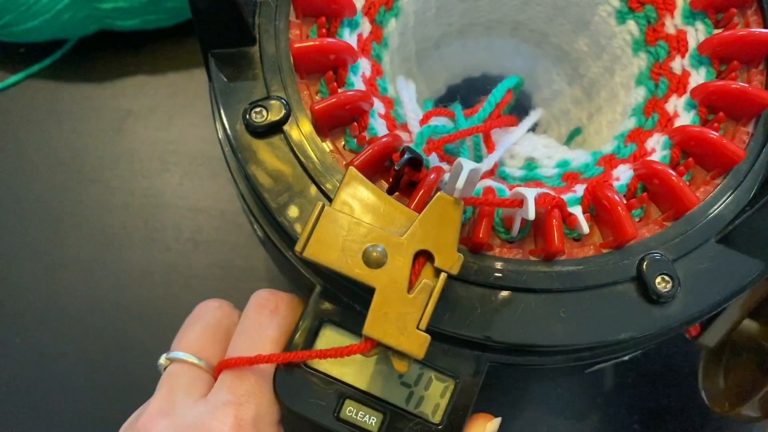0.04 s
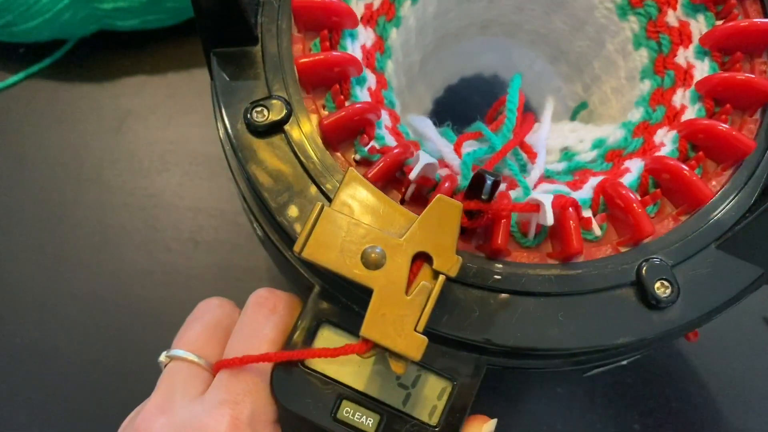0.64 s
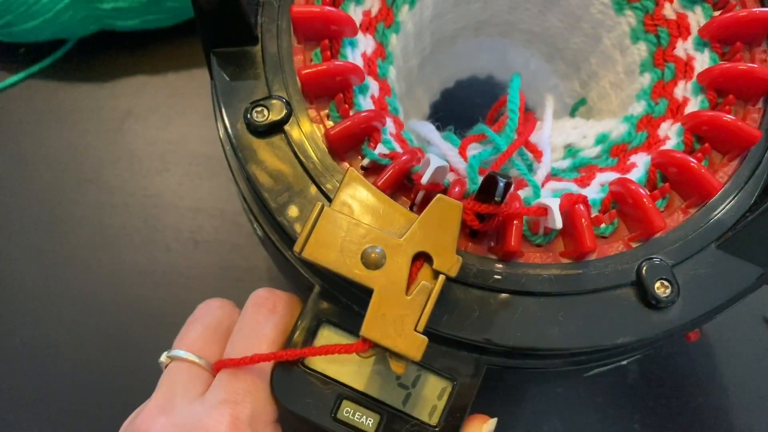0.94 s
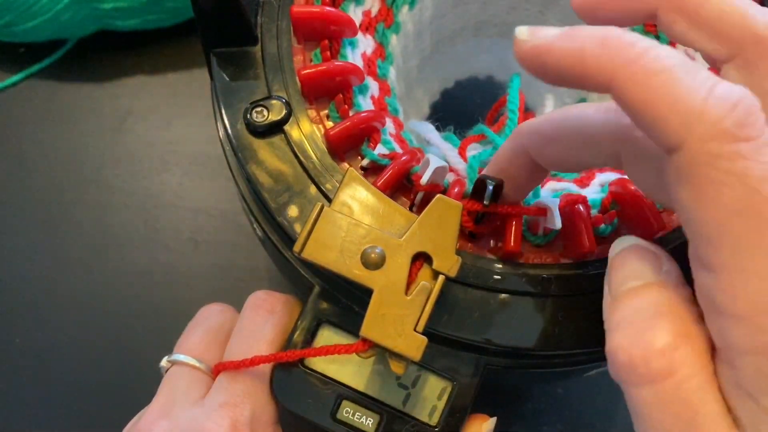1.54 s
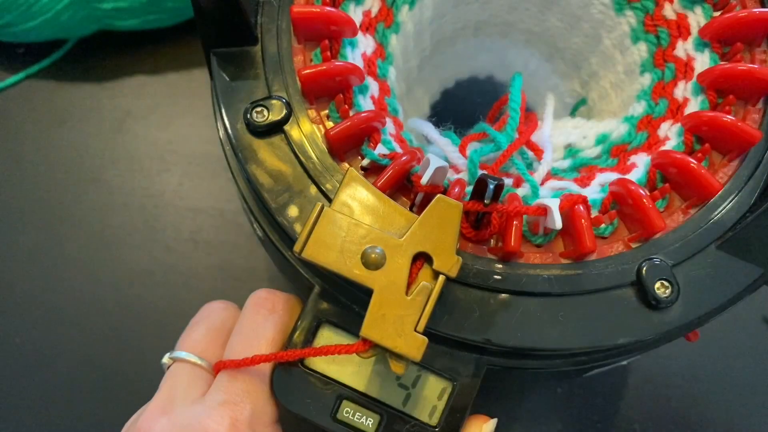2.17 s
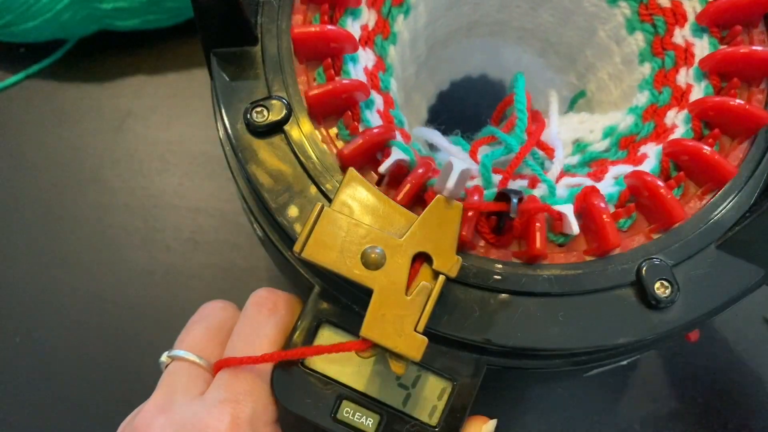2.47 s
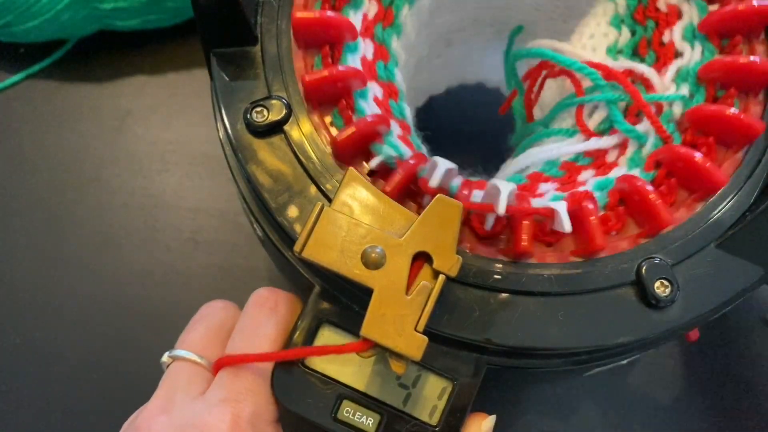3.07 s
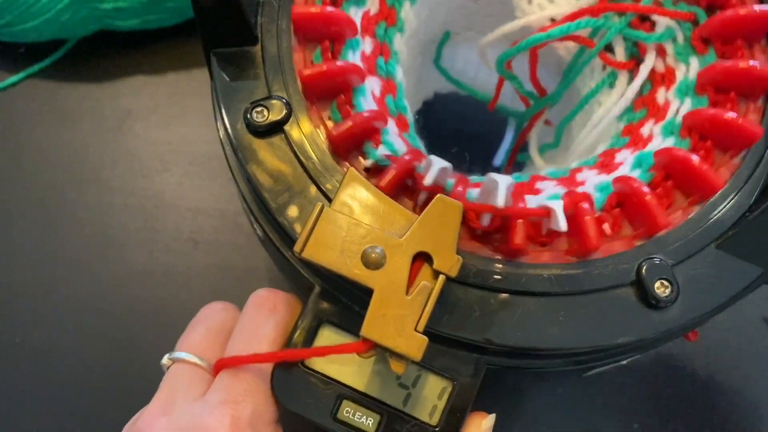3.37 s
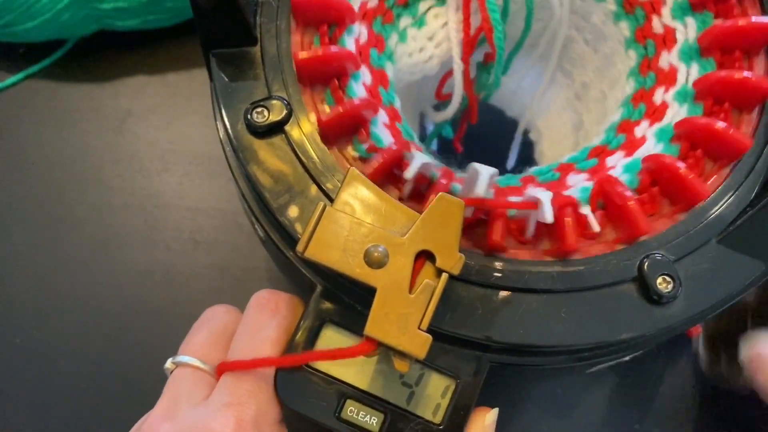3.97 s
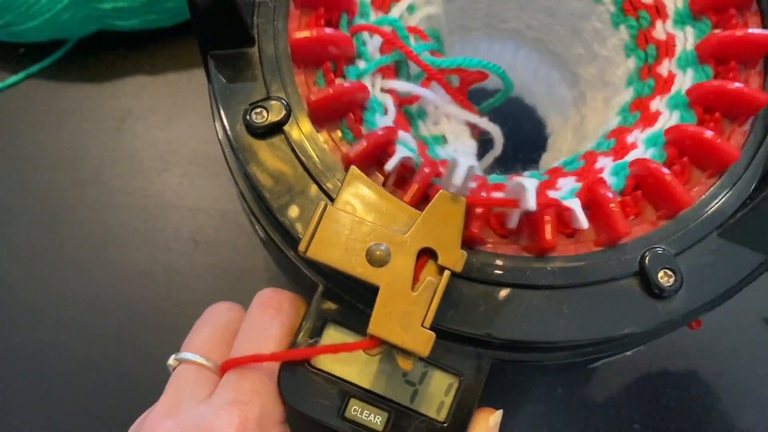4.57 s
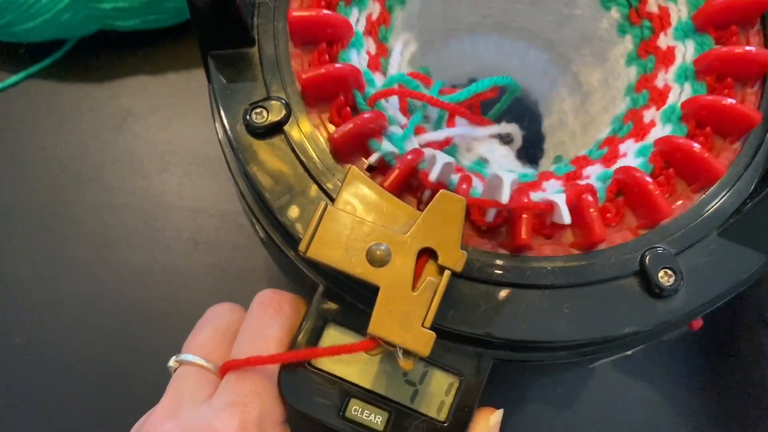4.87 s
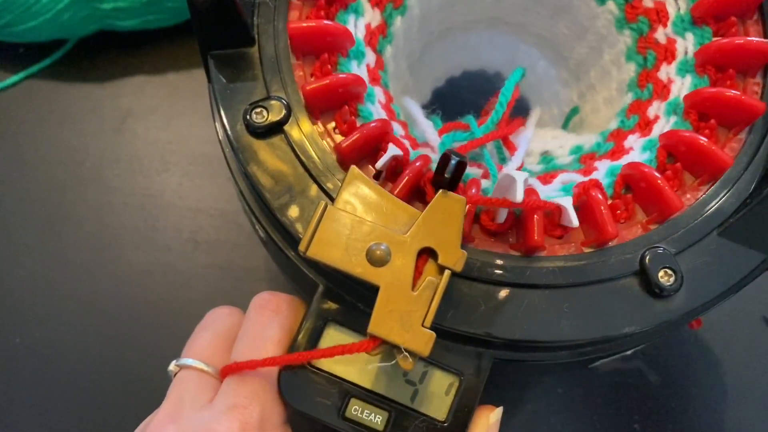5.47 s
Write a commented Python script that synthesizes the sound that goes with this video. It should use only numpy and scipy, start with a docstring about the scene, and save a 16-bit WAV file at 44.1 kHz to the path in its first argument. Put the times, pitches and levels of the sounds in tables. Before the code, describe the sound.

Close up in a small room, a plastic knitting machine winds down with quiet scraping and ticking. A short lull holds only a few light clicks and faint finger brushes. Then the crank turns again for about three seconds: needles clack, snap and rattle quickly against the hollow casing over rubbing plastic, hissing yarn and a low rumble of gears, before the clatter thins out and softens.

```python
"""A low gear rumble, faint squeaks, then rubbing and clacking: a hand-cranked plastic circular knitting
machine on a table in a small room. It slows to rest, a finger flicks a needle and nudges the ring,
then it runs a full round and slows again. Needles rub along the cam track, click, rattle and clack
as they drop; yarn hisses through the guide. The gears shake the table and the hollow drum."""
import sys
import numpy as np
from scipy import signal
from scipy.fft import rfft, irfft, next_fast_len
from scipy.io import wavfile
from scipy.ndimage import uniform_filter1d

SR = 44100
rng = np.random.default_rng(int(sys.argv[2]) if len(sys.argv) > 2 else 0)


def generate_wav(signal):
    """Clip the signal to [-1, 1] and save it as 16-bit WAV at the path in sys.argv[1]."""
    frames = np.transpose(np.atleast_2d(signal))
    scaled = np.clip(frames, -1, 1) * 32767
    pcm = np.round(scaled).astype(np.int16)
    wavfile.write(sys.argv[1], SR, pcm)


N = 242991
TIME_S = np.arange(N) / SR
FFT_SIZE = 2 * next_fast_len(N // 2 + 4096)
MID_ONLY = np.array([[1], [0]])   # two-row signals are mid and side

# Strain on the drive. Each row: time in seconds, table rumble in dB, drum hum in dB.
DRIVE_STRAIN = [(0.0, -69, -64), (0.05, -51, -64), (0.26, -52, -54.5), (0.43, -69, -63), (0.69, -62, -62.5),
                (0.88, -68, -67.5), (0.93, -66, -58), (1.06, -60, -68), (1.11, -78, -87),
                (1.66, -83, -88.5), (1.68, -56, -71), (1.78, -74, -88), (1.98, -83.5, -92),
                (2.03, -64, -88), (2.18, -58, -56.5), (2.32, -66, -66), (2.47, -46.5, -46),
                (2.62, -53.5, -55.5), (3.3, -46, -45.5), (3.9, -46.5, -47.5), (4.05, -54, -46),
                (4.14, -42, -50), (4.3, -47, -45.5), (4.62, -52, -52), (4.75, -43, -50), (5.12, -54, -50),
                (5.3, -63, -59.5), (5.51, -62.5, -56)]
# Resonances. Each row: frequency in Hz, bandwidth in Hz, gain in dB.
TABLE_RESONANCES = [(65.1, 6, 3), (90.7, 30, -2), (114.5, 5, -10), (131.4, 8.3, -4.5)]
DRUM_RESONANCES = [(179, 39, -9), (192, 6.7, 3), (274.7, 37, -12.5), (339, 16, -16.5)]
CASING_RESONANCES = [(452.3, 20, 7), (516.5, 20, 0.5), (690, 145, -2), (780, 42, 0.5), (1070, 18, -19.5),
                     (1520, 34, -30), (1740, 96, -4.5), (2300, 113, -6), (4240, 250, -8), (4740, 550, -4.5)]
# Tight plastic slips. Each row: start in seconds, length in seconds, pitch in Hz, level in dB.
SQUEAK_EVENTS = [(0.005, 0.01, 1910, -58), (0.029, 0.014, 1720, -51), (0.361, 0.0083, 3050, -50),
                 (3.786, 0.012, 3160, -33)]
# Two spells of cranking, a list each. Each row: time in seconds, rub gain in dB, hiss gain in dB.
CRANK_SPELLS = [
    [(0.042, -47, -79), (0.142, -50, -57), (0.25, -47, -54.5), (0.36, -47.5, -63), (0.48, -48.5, -57),
     (0.626, -54, -63), (0.7, -77, -70.5)],
    [(2.28, -61.5, -77), (2.34, -46, -59.5), (2.41, -46, -57), (2.49, -39.5, -44.5), (2.6, -47.5, -51),
     (2.66, -41.5, -52), (2.74, -43.5, -51), (2.87, -47.5, -45), (3.01, -40.5, -43), (3.12, -38, -44.5),
     (3.35, -42.5, -44.5), (3.43, -38, -44.5), (3.52, -34.5, -43), (3.75, -42, -41.5), (3.95, -39, -41.5),
     (4.22, -41, -43), (4.3, -39.5, -44), (4.42, -40, -43.5), (4.6, -49.5, -50.5), (4.69, -43.5, -45.5),
     (4.78, -42.5, -50), (4.98, -47, -48.5), (5.15, -41.5, -52), (5.32, -50.5, -55), (5.51, -54.5, -68.5)],
]
# Needles and ring hit the shell. Each row: start in seconds, gain in dB, body and treble in dB
# relative to that gain, pitch of the struck spot in Hz.
SHELL_KNOCKS = [(0.0308, -48.5, 3, -29, 696), (0.045, -37.5, -3.5, -18.5, 714),
                (0.0765, -40.5, -14, -24, 1240), (0.0815, -38, -10, -19.5, 720), (0.1128, -53, 4, -24, 750),
                (0.148, -53, 1, -19, 900), (0.172, -50, -1, -22, 1110), (0.227, -58, -15, -17, 950),
                (0.263, -47.5, -2, -27, 1200), (0.351, -54, -15, -20, 1050), (0.4045, -72, -3, -22, 1020),
                (0.452, -49, -17, -14, 720), (0.476, -62, 9, -20, 1020), (0.508, -55, -3, -22, 890),
                (0.5767, -63.5, 14, -2, 980), (0.6454, -59.5, 9, -2, 740), (0.7572, -55, -2, -29, 497),
                (0.918, -62.5, 8, -34, 870), (0.9413, -38, -13, -27, 820), (0.9606, -49.5, 1, -29, 726),
                (1.0224, -64, 2, -36, 790), (1.039, -74, 5, -34, 740), (1.0519, -70.5, 11, -37, 596),
                (1.2377, -37.5, -15, -9.5, 592), (1.2385, -51.5, 0.5, -22, 917),
                (1.6679, -48.5, -2, -12, 680), (1.669, -53.5, 2.5, -21, 980),
                (1.7221, -55.5, 0.5, -22, 934), (2.0138, -66, 12, 3, 670), (2.0369, -45, -0.5, -38, 830),
                (2.1267, -54.5, -1, -41, 716), (2.1819, -72, 18.5, -37, 730),
                (2.2801, -46.5, -7.5, -48, 836), (2.4683, -32, -33, -26, 740), (2.517, -32.5, -8, -21, 680),
                (2.6557, -33, -18, -35, 684), (2.6844, -31, -11, -17, 794),
                (2.7876, -28.5, -13.5, -17, 724), (2.809, -28, -4.5, -21, 760), (2.8287, -28, -1, -19, 685),
                (2.9372, -29.5, -5, -23, 635), (2.953, -26.5, -4.5, -29, 548),
                (2.9635, -34, -6.5, -20, 610), (3.0116, -43, 7, -19, 717), (3.0334, -32, -3.5, -19, 1035),
                (3.0564, -29, -4.5, -17, 710), (3.078, -33, -3, -27, 820), (3.0896, -25, -31, -16, 784),
                (3.1289, -43, -14, -21, 620), (3.151, -34.5, -8, -11, 780), (3.1743, -22, -10, -22.5, 431),
                (3.1885, -27, -6.5, -17, 815), (3.2331, -28, -16, -28, 800), (3.244, -19.5, -6, -16, 1150),
                (3.2465, -19.5, -8, -31, 1610), (3.2694, -27.5, -2.5, -15, 585),
                (3.3346, -32, -5, -23, 1190), (3.3755, -31.5, -6, -14.5, 680),
                (3.3834, -35.5, 3.5, -35, 784), (3.3969, -25, -8, -22, 820), (3.4053, -32, -10, -14, 536),
                (3.4575, -33.5, -2, -19, 570), (3.4707, -31, -9, -28, 800), (3.489, -23, -2.5, -29, 486),
                (3.5014, -25.5, -11, -12.5, 797), (3.5165, -25, -6, -36, 512),
                (3.5768, -21.5, -11.5, -32, 710), (3.5826, -34.5, -3, -8.5, 507),
                (3.6027, -37, -4, -14, 890), (3.6269, -25, -0.5, -24, 1433), (3.631, -39, -1, -17, 730),
                (3.687, -24, -5.5, -20, 760), (3.7735, -20.5, -8.5, -33, 1320), (3.7869, -31, -3, -28, 768),
                (3.8064, -26.5, -5, -21, 528), (3.8208, -28, -14, -14.5, 705),
                (3.8554, -31.5, -1.5, -14, 640), (3.8869, -23.5, -9, -25, 737),
                (3.9001, -22, -14.5, -22, 486), (3.9144, -28.5, -15, -16, 780),
                (3.9983, -22, -5.5, -19.5, 1540), (4.0141, -24, -10, -18.5, 700),
                (4.024, -23, -17.5, -21, 602), (4.0604, -44.5, 5.5, -13, 540),
                (4.0782, -29.5, -5, -21, 810), (4.1128, -23, -13, -17, 524), (4.2339, -19, -7.5, -20, 697),
                (4.2503, -31, -5, -14, 736), (4.344, -35.5, -0.5, -12, 1060), (4.367, -19, -9.5, -17, 614),
                (4.464, -28, -6.5, -28, 546), (4.5186, -19.5, -7.5, -21, 704),
                (4.5264, -30, -0.5, -21, 513), (4.653, -43, 3.5, -26, 1140), (4.6768, -31.5, -12, -21, 810),
                (4.7077, -23, -3, -15.5, 628), (4.7174, -28.5, -6, -15, 780), (4.7254, -38, -11, -10, 467),
                (4.8838, -32.5, 1, -37, 794), (4.8893, -36, 4, -33, 499), (5.017, -33.5, -9.5, -31, 510),
                (5.0564, -32, -4.5, -11, 850), (5.1332, -35, -3, -39, 873)]
# Body, main, click and treble bands. Each row: low and high edge in Hz, T60 in seconds, gain in dB.
CONTACT_BANDS = [(461, 1313, 0.056, -2.5), (1530, 3120, 0.048, -10), (2730, 5220, 0.035, 4),
                 (5980, 16600, 0.027, 3.5)]
# Sharp plastic clicks: mostly bright needle snaps, plus the click of two dull knocks.
# Each row: start in seconds, gain in dB, body, click and treble in dB relative to that gain.
PLASTIC_CLICKS = [(0.2777, -31, -18, -9.5, -3.5), (1.2285, -33.5, -13.5, -4, -16),
                  (2.0365, -41.5, -16, -14, -40), (2.28, -60, -12, -19, -43), (2.428, -45, -14, -3, -18),
                  (2.7693, -29.5, -9, -4.5, 1.5), (2.827, -36, -17, -10, -8),
                  (2.8404, -23.5, -18, -14, -18.5), (2.9645, -29.5, -12, -20, -11),
                  (3.068, -33, -17, -6, -17), (3.082, -37, -11, -15, -10), (3.1506, -28.5, -2.5, -13, -6),
                  (3.167, -29, -10, -12, -20), (3.2831, -20.5, -7, -24, -15.5),
                  (3.406, -28.5, -12, -15, -12), (3.6012, -27, -20, -19, -11.5),
                  (3.7026, -23.5, -7.5, -15.5, -15.5), (3.822, -34, -11, -17, -16),
                  (3.919, -28, -8, -7, -16), (4.0252, -28, -22, -6.5, -23), (4.1148, -28.5, -3.5, -15, -8),
                  (4.1368, -28, -6, -13, -17), (4.145, -27, -8, -9, -20), (4.264, -24, -17, -12.5, -16),
                  (4.345, -30, -22, -16, -6.5), (4.379, -26, -7, -15, -26), (4.3996, -26.5, -16, -15, -15),
                  (4.408, -35, -14, -19, -8), (4.5412, -25, -14, -18, -20), (4.5494, -28, -10, -12, -11.5),
                  (4.562, -39, -14, -3, -25), (4.7398, -29.5, -23, -11, -15.5), (4.924, -44, -24, -21, -28),
                  (4.9384, -28.5, -16, -13, -16), (5.097, -35.5, -8, -15, -29),
                  (5.1398, -30.5, -13, -16, -14.5), (5.346, -30, -13, -9, -5.5)]
# Modes of a needle. Each row: frequency in Hz, T60 in seconds, gain in dB.
NEEDLE_MODES = [(2480, 0.018, -5.5), (3610, 0.018, -0.5), (4760, 0.017, -2.5), (8100, 0.019, 1.5),
                (10780, 0.016, 5.5)]
# Swells of friction. Each row: start in seconds, length in seconds, gain in dB.
FINGER_BRUSHES = [(0.762, 0.12, -64), (0.879, 0.066, -73), (1.548, 0.19, -75.5), (1.795, 0.028, -71),
                  (1.997, 0.039, -68), (2.158, 0.04, -73)]
CAM_SCRAPES = [(2.896, 0.055, -42), (3.459, 0.054, -35), (3.552, 0.05, -43), (4.177, 0.073, -38),
               (4.527, 0.039, -36.5)]
# Drive slack closes. Each row: centre in seconds, level in dB, pitch in Hz, half length in seconds.
SLACK_POPS = [(3.25, -14, 910, 0.00047), (4.715, -11.5, 955, 0.00077), (4.8885, -14, 850, 0.0012)]
# Spectra of the friction noises and the still air. Each row: frequency in Hz, relative level in dB.
RUB_SPECTRUM = [(200, -26), (340, -23), (470, -4), (780, 3), (1200, -3), (2200, -12.5), (3500, -17),
                (6000, -27), (12000, -23.5)]
GRIT_SPECTRUM = [(300, -15), (800, -3), (1700, 2.5), (3200, 1), (5000, -13), (9000, -25), (16000, -31.5)]
HISS_SPECTRUM = [(800, -8), (2000, 6), (4700, -1.5), (6000, -4), (8300, -1), (11000, -3), (13000, -2),
                 (16000, -1)]
RATTLE_SPECTRUM = [(150, -14.5), (500, -1), (900, -0.5), (2200, 5.5), (4500, -7.5), (7000, -6.5),
                   (15000, -25)]
BRUSH_SPECTRUM = [(300, 25), (900, 23), (2000, 16.5), (4500, 12.5), (6500, 5), (9000, 15), (16000, -16)]
SCRAPE_SPECTRUM = [(200, -19), (480, -5), (1700, -3.5), (4000, -11.5), (7000, -15), (15000, -16)]
AIR_SPECTRUM = [(15, -23), (25, -18.5), (80, 6.5), (363, -5), (405, -10.5), (775, -12.5), (1290, -24),
                (1610, -21.5), (8830, -28), (9570, -28.5), (16000, -33)]
# Stereo width. Each row: frequency in Hz, side gain in dB.
SIDE_RESPONSE = [(60, -17.5), (200, -16), (400, -9.5), (750, -11), (1300, -6.5), (2400, -10.5), (3500, -2),
                 (4600, -7), (7500, -2.5), (8500, -8.5), (15000, -15)]
# Two microphone ports. Each row: frequency in Hz, left lead in radians, left over right in dB.
MIC_PORTS = [(20, 0, -.8), (300, 0, -.8), (600, .2, 1.2), (1000, .4, 0), (1500, 0, -1.5), (2800, .9, 1.5),
             (3700, .7, 4), (5000, .8, 1.5), (6000, -.4, 0), (7200, -.4, 0), (8000, -3.5, 0), (9000, -4, 0),
             (10300, -6.1, 0), (11600, -6.7, 0), (12600, -9, 0), (13900, -9.7, 0), (15300, -12.4, 0)]
# Microphone colour. Each row: frequency in Hz, gain in dB.
MIC_RESPONSE = [(20, -9), (50, -0.5), (7500, -3.5), (8300, 0), (9200, -1.5), (11000, -4.5), (12000, -5.5),
                (16000, -7)]


def from_db(db):
    """Decibels to gain."""
    return 10 ** (np.asarray(db) / 20)


def unit_rms(x):
    """Scale to unit power."""
    return x / np.sqrt(np.mean(x ** 2) + 1e-20)


def curves(rows):
    """Each column after the time, interpolated to every sample."""
    times_s, *columns = np.transpose(rows)
    return [np.interp(TIME_S, times_s, column) for column in columns]


def swell(start_s, length_s, db):
    """Half-sine envelope."""
    return from_db(db) * np.sin(np.pi * np.clip((TIME_S - start_s) / length_s, 0, 1))


def drift(rate_hz):
    """Smooth random wander, unit power."""
    return unit_rms(np.interp(TIME_S * rate_hz, np.arange(N), rng.standard_normal(N)))


def band(x, low_hz, high_hz):
    """Band-pass."""
    return signal.sosfilt(signal.butter(3, [low_hz, high_hz], "band", fs=SR, output="sos"), x)


def colour(x, spectrum):
    """Minimum-phase filter following rows of Hz and dB."""
    hz, db = np.transpose(spectrum)
    nyquist_bin = FFT_SIZE // 2
    grid_hz = np.linspace(0, SR / 2, nyquist_bin + 1)
    gain = from_db(np.interp(np.log(grid_hz + 1), np.log(hz), db))
    cepstrum = irfft(np.log(gain))
    cepstrum[1:nyquist_bin] *= 2
    cepstrum[nyquist_bin + 1:] = 0
    return irfft(rfft(x, FFT_SIZE) * np.exp(rfft(cepstrum)))[..., :N]


def resonate(x, modes):
    """Parallel two-pole resonators."""
    out = 0
    for hz, width_hz, db in modes:
        radius = np.exp(-np.pi * width_hz / SR)
        poles = [1, -2 * radius * np.cos(2 * np.pi * hz / SR), radius ** 2]
        out += from_db(db) * (1 - radius ** 2) / 2 * signal.lfilter([1, 0, -1], poles, x + 1e-18)
    return out


def stick_slip(per_s, spread_db, smooth):
    """Tiny uneven clicks over smooth friction noise, unit power."""
    slips = rng.random(N) < per_s / SR
    sizes = from_db(spread_db * np.minimum(rng.exponential(1, N), 3))
    clicks = unit_rms(slips * sizes * rng.choice([-1, 1], (2, N)))
    return unit_rms(clicks + smooth * rng.standard_normal((2, N)))


def steady(x, window_s=0.18):
    """Even out slow level changes, keep the flutter; unit power."""
    power = uniform_filter1d(x[0] ** 2, int(window_s * SR))
    return unit_rms(x / np.sqrt(power + 1e-12))


def gears(jolt_db=-28.5, jolt_follows=0.64, jolt_decay_s=0.032, drum_jolt_db=2):
    """Meshing teeth bump the low modes of table and hollow drum; shell knocks jolt both."""
    kicks = np.zeros(N)
    for start_s, db, body_db, *_ in SHELL_KNOCKS:
        kicks[int(start_s * SR)] = from_db(jolt_db + jolt_follows * (db + body_db))
    jolt = signal.lfilter([1], [1, -np.exp(-1 / (jolt_decay_s * SR))], kicks + 1e-18)
    teeth = stick_slip(per_s=250, spread_db=3.5, smooth=0.85)
    rumble = steady(band(resonate(teeth, TABLE_RESONANCES), 47, 149))
    hum = steady(band(resonate(teeth, DRUM_RESONANCES), 138, 547))
    rumble_db, hum_db = curves(DRIVE_STRAIN)
    rumble_gain = np.hypot(from_db(rumble_db), jolt)
    hum_gain = np.hypot(from_db(hum_db), from_db(drum_jolt_db) * jolt)
    return rumble_gain * rumble + hum_gain * hum


def squeaks(waver=0.0283):
    """Plastic slips on plastic in brief, unsteady tones."""
    clock_s = np.cumsum(1 + waver * drift(rate_hz=244)) / SR
    return MID_ONLY * sum(swell(start_s, length_s, db) * np.sin(2 * np.pi * hz * clock_s)
                          for start_s, length_s, hz, db in SQUEAK_EVENTS)


def cam_rub(wander_db=1.5):
    """Needles rub the cam and shift in their slots, so each band swells and sinks on its own."""
    rest = colour(stick_slip(per_s=600, spread_db=1.5, smooth=1.17), RUB_SPECTRUM)
    out = 0
    for edge_hz in (650, 1100, 2000, 4000):
        low = signal.sosfilt(signal.butter(1, edge_hz, fs=SR, output="sos"), rest)
        out += low * from_db(wander_db * drift(rate_hz=70))
        rest = rest - low
    return unit_rms(out + rest)


def cam_grit(decay_s=0.0015):
    """Sparse catches on the cam track, each a brief burr."""
    t = TIME_S[:SR // 100]
    catches = stick_slip(per_s=110, spread_db=3, smooth=0)
    power = signal.fftconvolve(catches[0] ** 2, np.exp(-2 * t / decay_s))[:N]
    burrs = np.sqrt(np.abs(power)) * rng.standard_normal((2, N))
    return unit_rms(colour(burrs, GRIT_SPECTRUM))


def sliding(ease_s=0.031, grit_db=-11, rub_trim_db=-3, hiss_trim_db=0.97, snag_db=2):
    """While the ring turns, needles slide along the cam and yarn hisses through the guide."""
    rub = cam_rub() + from_db(grit_db) * cam_grit()
    hiss = unit_rms(colour(stick_slip(per_s=2500, spread_db=3, smooth=1), HISS_SPECTRUM))
    out = 0
    for spell in CRANK_SPELLS:
        rub_db, hiss_db = curves(spell)
        inside_s = np.minimum(TIME_S - spell[0][0], spell[-1][0] - TIME_S)
        moving = np.clip(inside_s / ease_s + 1, 0, 1)
        hiss_gain = from_db(hiss_db + hiss_trim_db + snag_db * drift(rate_hz=13))
        out += moving * (from_db(rub_db + rub_trim_db) * rub + hiss_gain * hiss)
    return out


def blow(start_s, db, body_db, treble_db, hz):
    """Row for one blow on the shell; its click level follows its treble."""
    click_db = -7.5 + 0.31 * treble_db
    return start_s, db, body_db, click_db, treble_db, hz


def knocks(rebound_s=0.014, scatter_s=0.002, rebound_db=-12.5):
    """Blow rows: needles and ring hit the shell and bounce once."""
    hits = [blow(*row) for row in SHELL_KNOCKS]
    rebounds = [(start_s + rebound_s + scatter_s * rng.standard_normal(), db + rebound_db, *timbre)
                for start_s, db, *timbre in hits]
    return hits + rebounds


def contacts(rows, crack_db=2, crack_s=0.0025, rise_s=0.0013, click_follows=0.31):
    """Each contact cracks, then the crowded modes of the plastic die away, highest first."""
    t = TIME_S[:SR // 5]
    start_s, db, body_db, click_db, treble_db, *_ = np.transpose(rows)
    offsets_db = body_db, 0, click_db + click_follows * treble_db, treble_db
    crack = from_db(crack_db) * np.exp(-t / crack_s)
    out = np.zeros((2, N + len(t)))
    for (low_hz, high_hz, t60_s, band_db), offset_db in zip(CONTACT_BANDS, offsets_db):
        envelope = (from_db(-60 * t / t60_s) + crack) * (1 - np.exp(-t / rise_s))
        bursts = band(rng.standard_normal((len(rows), 2, len(t))) * envelope, low_hz, high_hz)
        attack_rms = np.sqrt(np.mean(bursts[..., :SR // 100] ** 2, axis=-1, keepdims=True))
        gains = from_db(db + band_db + offset_db)
        for at, gain, burst in zip((start_s * SR).astype(int), gains, bursts / attack_rms):
            out[:, at:at + len(t)] += gain * burst
    return out[:, :N]


def shell_rings(blows, t60_cycles=30.6, rise_s=0.001, body_trim_db=5, overtone_db=-9):
    """The struck spot bends and rings at its own hollow pitch, with one overtone."""
    t = TIME_S[:SR // 5]
    out = np.zeros(N + len(t))
    overtone_ratios = 1.8 * np.exp(0.1995 * rng.standard_normal(len(blows)))
    for (start_s, db, body_db, _, _, hz), ratio in zip(blows, overtone_ratios):
        envelope = from_db(db - 60 * t * hz / t60_cycles) * (1 - np.exp(-t / rise_s))
        fundamental = from_db(body_db + body_trim_db) * np.sin(2 * np.pi * hz * t)
        overtone = from_db(overtone_db) * np.sin(2 * np.pi * hz * ratio * t)
        at = int(start_s * SR)
        out[at:at + len(t)] += envelope * (fundamental + overtone)
    return MID_ONLY * out[:N]


def rattles(lead_s=0.0011, hold_s=0.014, release_s=0.0034, trim_db=-12.5, knock_share=0.97):
    """While the ring turns, a needle stutters down the cam in a run of clicks round each knock."""
    force = np.zeros(N)
    for spell in CRANK_SPELLS:
        times_s, rub_db, _ = np.transpose(spell)
        for start_s, knock_db, *_ in SHELL_KNOCKS:
            if times_s[0] < start_s < times_s[-1]:
                db = knock_share * knock_db + (1 - knock_share) * np.interp(start_s, times_s, rub_db)
                age_s = TIME_S - start_s + lead_s
                live = (age_s > 0) & (age_s < 2 * hold_s)
                release = np.exp(-np.maximum(age_s[live] - hold_s, 0) / release_s)
                force[live] = np.maximum(force[live], from_db(db + trim_db) * release)
    clicks = stick_slip(per_s=600, spread_db=4, smooth=0.67)
    return force * unit_rms(colour(clicks, RATTLE_SPECTRUM))


def needle_rings(rise_s=0.00051, pitch_scatter=0.023, treble_edge_hz=5500):
    """High needle modes ring briefly with each plastic click, never quite alike."""
    t = TIME_S[:SR // 10]
    hz, t60_s, mode_db = np.transpose(NEEDLE_MODES)
    envelopes = from_db(-60 * t / t60_s[:, None]) * (1 - np.exp(-t / rise_s))
    out = np.zeros(N + len(t))
    for start_s, db, _, click_db, treble_db in PLASTIC_CLICKS:
        detune, uneven_db = rng.standard_normal((2, len(hz)))
        gains = from_db(db + mode_db + np.where(hz < treble_edge_hz, click_db, treble_db) + uneven_db)
        tones = np.sin(2 * np.pi * np.outer(hz * np.exp(pitch_scatter * detune), t))
        at = int(start_s * SR)
        out[at:at + len(t)] += gains @ (envelopes * tones)
    return MID_ONLY * out[:N]


def brushes():
    """Fingers and yarn brush the plastic: soft, smooth friction."""
    envelope = sum(swell(*row) for row in FINGER_BRUSHES)
    return envelope * unit_rms(colour(rng.standard_normal((2, N)), BRUSH_SPECTRUM))


def ticks(tries=36, threshold_db=-44.5, trim_db=0.5, spread_db=0.5, centre_hz=760, pitch_scatter=0.323):
    """Blow rows: loose needles jump at random, only while the rubbing is loud."""
    rows = []
    for spell in CRANK_SPELLS:
        times_s, rub_db, _ = np.transpose(spell)
        starts_s = rng.random(tries) * N / SR
        for start_s, (softness, detune) in zip(starts_s, rng.standard_normal((tries, 2))):
            rub_now_db = np.interp(start_s, times_s, rub_db)
            if times_s[0] < start_s < times_s[-1] and rub_now_db > threshold_db:
                db = rub_now_db + trim_db - spread_db * softness
                hz = centre_hz * np.exp(pitch_scatter * detune)
                rows.append(blow(start_s, db, body_db=-5.5, treble_db=-28, hz=hz))
    return rows


def scrapes():
    """A needle drags on the cam for a moment: coarse stick-slip."""
    envelope = sum(swell(*row) for row in CAM_SCRAPES)
    grains = stick_slip(per_s=900, spread_db=3, smooth=0.5)
    return envelope * unit_rms(colour(grains, SCRAPE_SPECTRUM))


def pops():
    """Slack in the drive closes with a blunt, hollow blow of a couple of cycles."""
    out = 0
    for centre_s, db, hz, half_s in SLACK_POPS:
        t = TIME_S - centre_s
        out += from_db(db) * np.sin(2 * np.pi * hz * t) * np.exp(-(t / half_s) ** 2)
    return MID_ONLY * out


def room(x, t60_s=0.29, gap_s=0.005, gain_db=-17):
    """Scattered wall reflections of the mid signal, duller than the direct sound."""
    t = TIME_S[:SR // 2]
    tail = rng.standard_normal((2, len(t))) * from_db(-60 * t / t60_s) * (t > gap_s)
    tail = band(tail, 143, 10200)
    tail /= np.sqrt(np.sum(tail ** 2) / 2)
    return from_db(gain_db) * signal.fftconvolve(x[:1], tail, axes=-1)[:, :N]


def scene(clicks_db=-0.5, needles_db=-4.5, air_db=-74):
    """Needle noise through the casing, plus the other sources, room and air; returns left and right."""
    blows = knocks() + ticks()
    needles = sliding() + scrapes() + rattles() + contacts(blows)
    needles += from_db(clicks_db) * contacts(PLASTIC_CLICKS)
    cased = from_db(needles_db) * (needles + resonate(needles, CASING_RESONANCES))
    machine = cased + shell_rings(blows) + needle_rings() + pops() + gears() + brushes() + squeaks()
    air = from_db(air_db) * unit_rms(colour(rng.standard_normal((2, N)), AIR_SPECTRUM))
    mid, side = machine + room(machine) + air
    side = colour(side, SIDE_RESPONSE)
    return np.array([mid + side, mid - side])


def record(dry, cutoff_hz=15900):
    """Sound bends round to two microphone ports, unequal in phase and level; coloured, top cut."""
    hz, *columns = np.transpose(MIC_PORTS)
    grid_hz = np.linspace(0, SR / 2, FFT_SIZE // 2 + 1)
    lead_rad, louder_db = (np.interp(grid_hz, hz, column) for column in columns)
    split = np.array([[0.5], [-0.5]])
    response = from_db(louder_db * split) * np.exp(1j * lead_rad * split)
    ports = irfft(rfft(dry, FFT_SIZE) * response)[:, :N]
    low_pass = signal.ellip(10, 0.1, 80, cutoff_hz, fs=SR, output="sos")
    return signal.sosfilt(low_pass, colour(ports, MIC_RESPONSE))


dry = scene()
out = record(dry)
generate_wav(out)
```